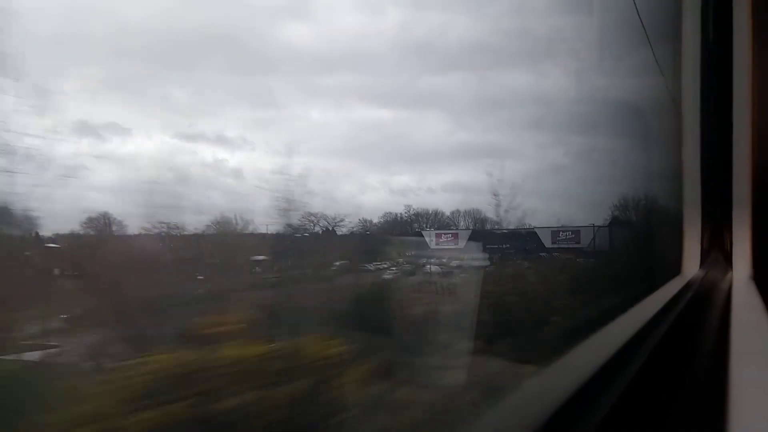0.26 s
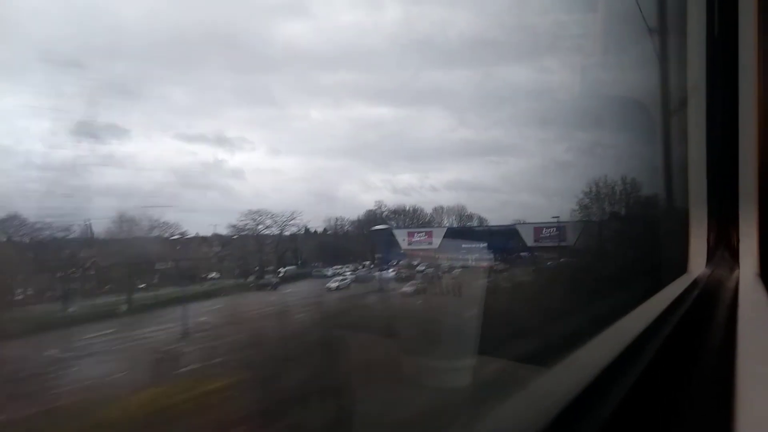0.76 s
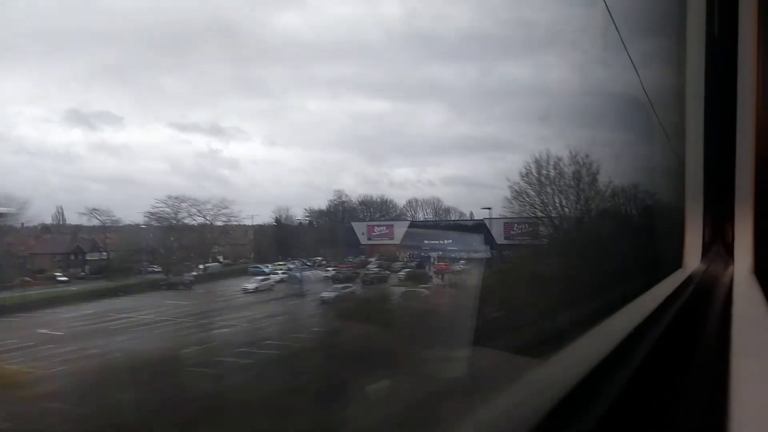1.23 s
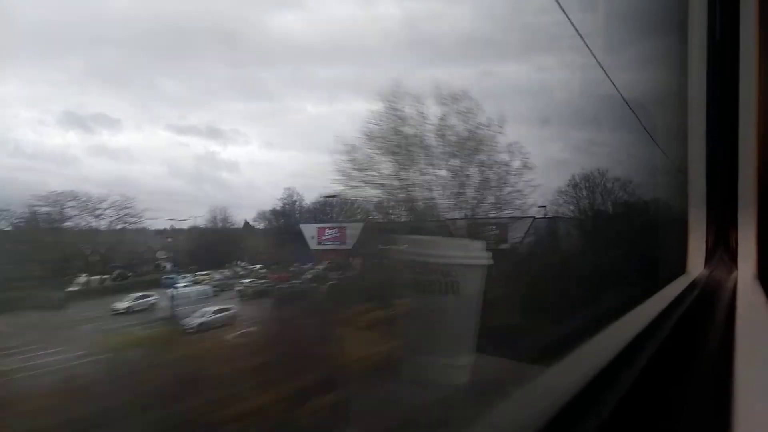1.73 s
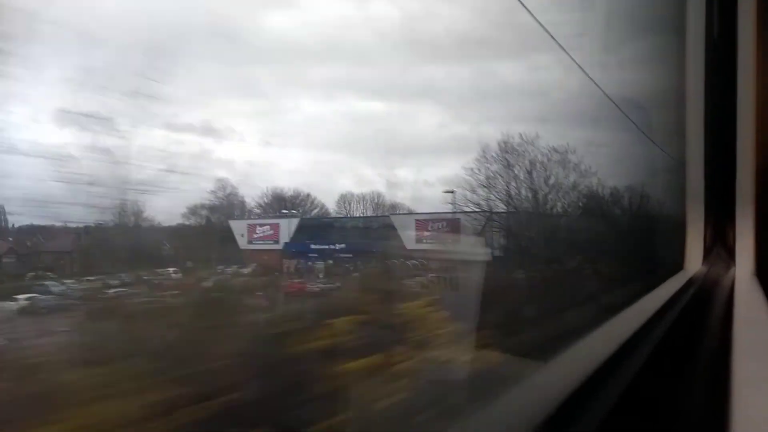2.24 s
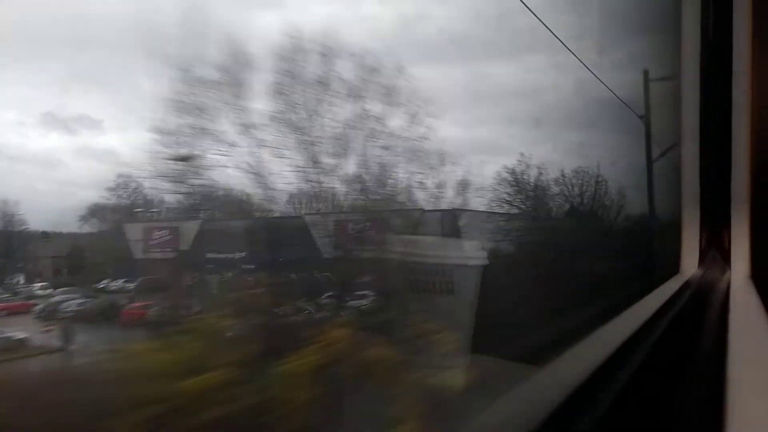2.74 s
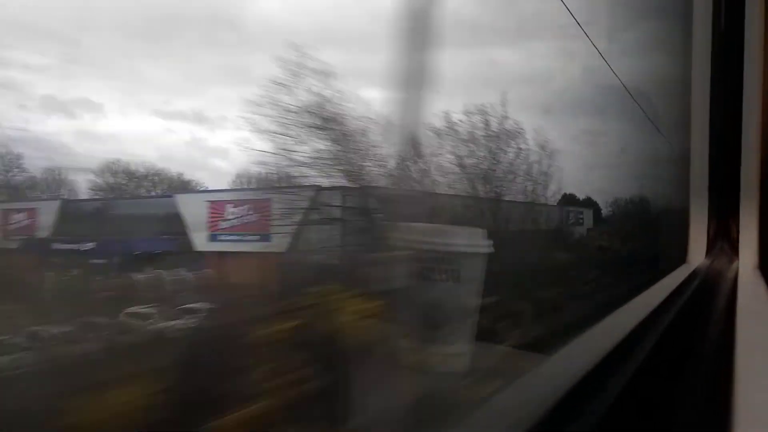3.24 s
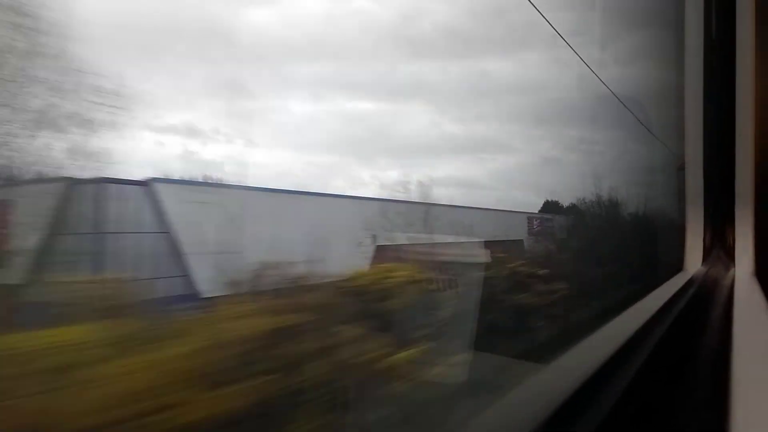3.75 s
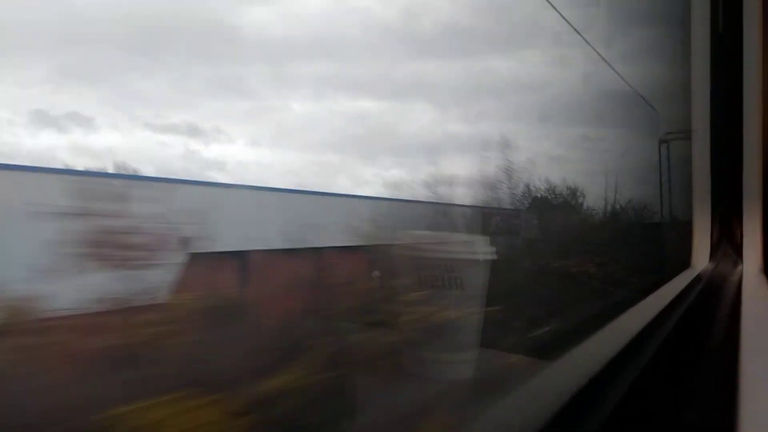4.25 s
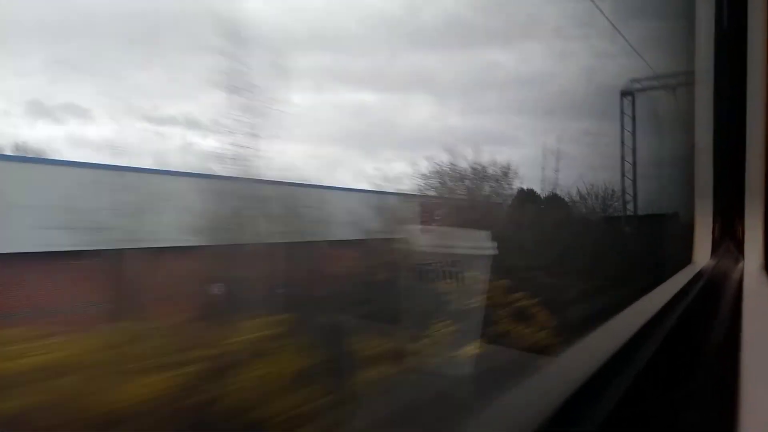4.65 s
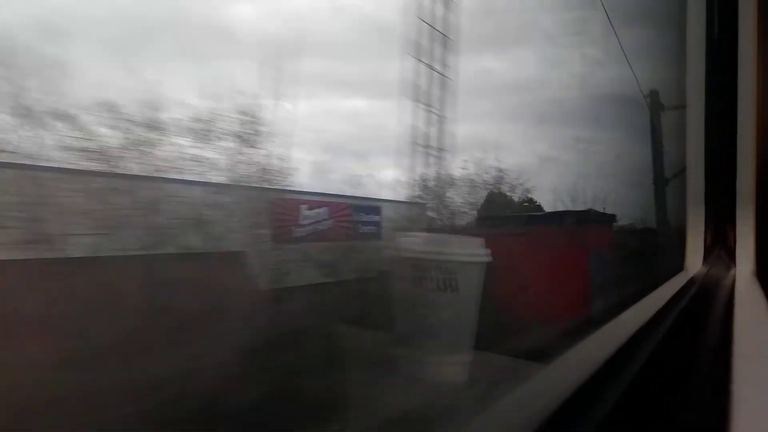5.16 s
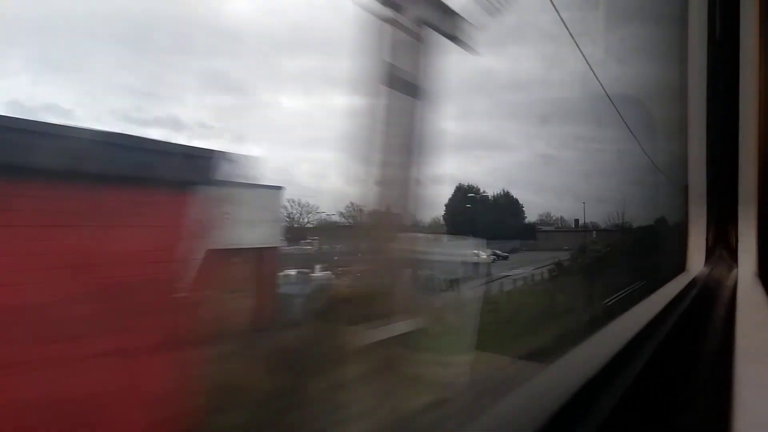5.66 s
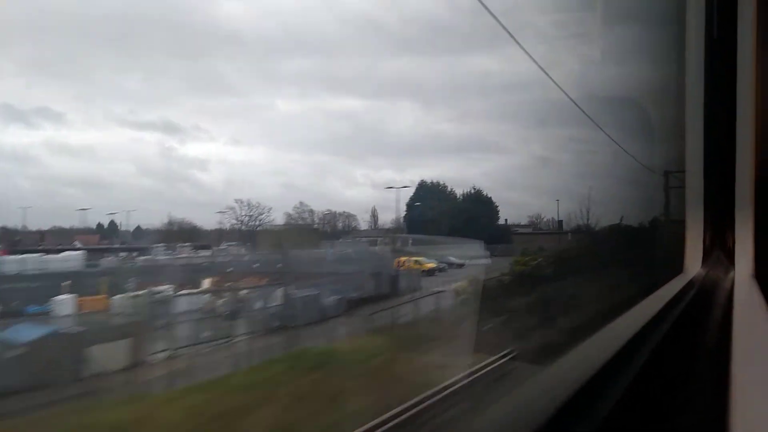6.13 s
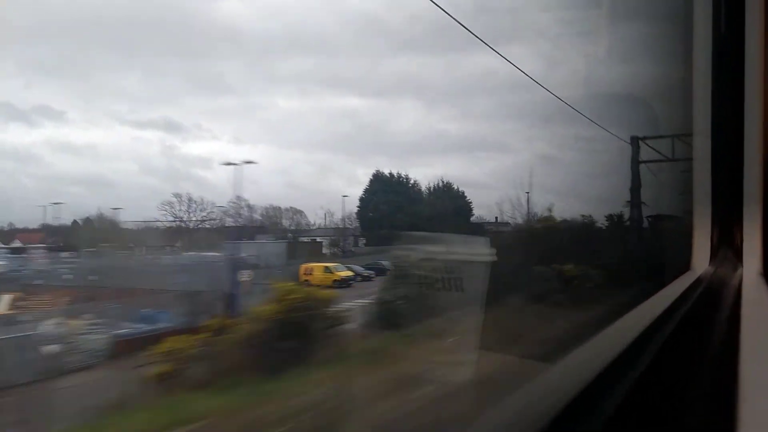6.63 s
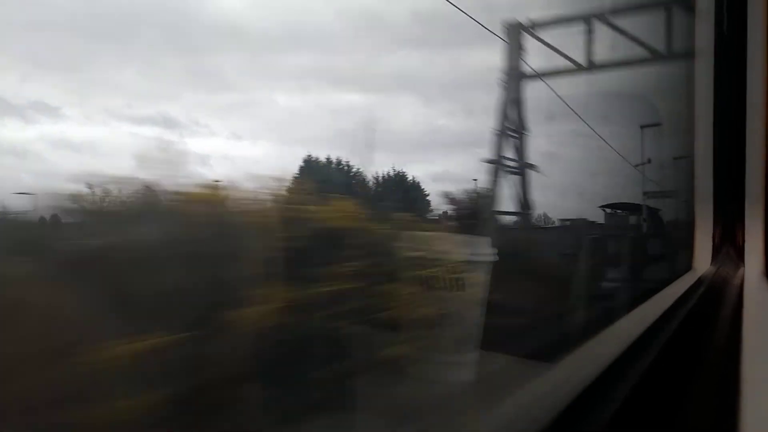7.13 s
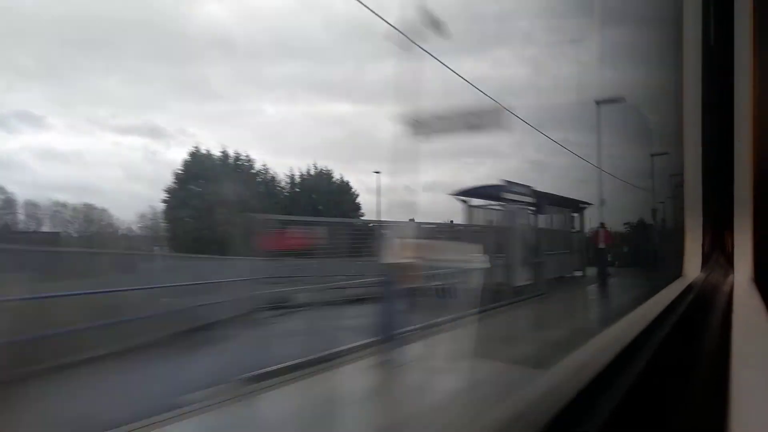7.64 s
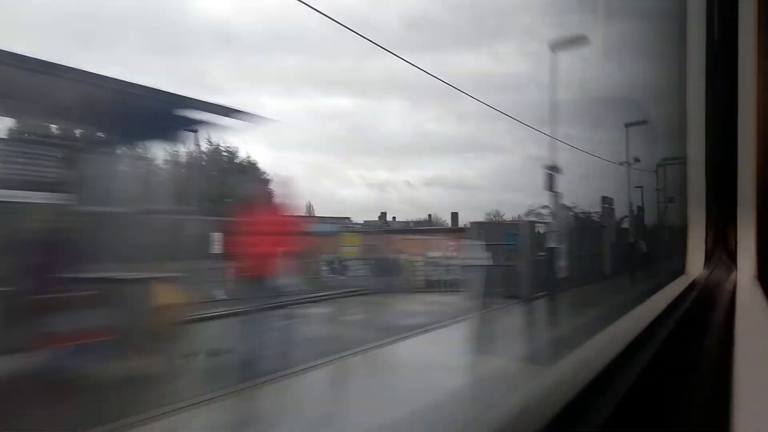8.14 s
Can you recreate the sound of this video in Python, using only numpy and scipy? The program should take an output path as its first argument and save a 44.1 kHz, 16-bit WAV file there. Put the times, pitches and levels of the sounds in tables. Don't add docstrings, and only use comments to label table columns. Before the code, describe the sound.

Inside a fast electric train, steady low wheel rumble and motor hum, crinkling wrapper, and two hard taps that briefly duck everything.

```python
import sys
import numpy as np
from scipy import signal
from scipy.fft import rfft, irfft, next_fast_len
from scipy.io import wavfile
from scipy.ndimage import uniform_filter1d, map_coordinates

SR = 44100
rng = np.random.default_rng(int(sys.argv[2]) if len(sys.argv) > 2 else 0)


def waveform_to_disk(signal):
    frames = np.transpose(np.atleast_2d(signal))
    scaled = np.clip(frames, -1, 1) * 32767
    samples = np.round(scaled).astype(np.int16)
    wavfile.write(sys.argv[1], SR, samples)


def volts(x):
    e = np.asarray(x, float) / 20
    return 10 ** e


N = 369980
RUMBLE_DB = -28.5


def unit(x):
    return x / np.sqrt(np.mean(x ** 2) + 1e-20)


def along(points, hz):
    f, v = np.transpose(points)
    return np.interp(np.log(hz + 1), np.log(f + 1), v)


def curves(rows):
    s, *cols = np.transpose(rows)
    return [np.interp(np.arange(N) / SR, s, c) for c in cols]


def wobble(rate_hz, count=N):
    knots = rng.standard_normal(int(count * rate_hz / SR) + 4)
    coarse = np.arange(0, count + 16, 16)
    values = map_coordinates(knots, [coarse * rate_hz / SR], mode="nearest")
    return np.interp(np.arange(count), coarse, values)


def filtered(x, response):
    m = next_fast_len(N + SR // 4)
    return irfft(rfft(x, m) * response(np.fft.rfftfreq(m, 1 / SR)), m)[..., :N]


def shaped(x, points):
    return unit(filtered(x, lambda hz: volts(along(points, hz))))


def patchy(patchy_db, size=512):
    z = signal.stft(rng.standard_normal(N), nperseg=size)[2]
    field = uniform_filter1d(rng.standard_normal(z.shape), size=5, axis=0)
    field = uniform_filter1d(field, size=8, axis=1)
    return signal.istft(z * volts(patchy_db * np.clip(unit(field), -2, 2)), nperseg=size)[1][:N]


def tone(pitch_hz, drift_rad):
    return np.sqrt(2) * np.sin(2 * np.pi * np.cumsum(pitch_hz) / SR + drift_rad * wobble(25))


def swell(start_s, end_s):
    inside = np.arange(round(start_s * SR), round(end_s * SR))
    inside = inside[(inside >= 0) & (inside < N)]
    out = np.zeros(N)
    out[inside] = np.sqrt(abs(np.sin(np.pi * (inside / SR - start_s) / (end_s - start_s))))
    return out


def add(track, s, sound):
    part = track[round(s * SR):][:len(sound)]
    part += sound[:len(part)]


# f/Hz, width/Hz, level/dB
BODY_MODES = [(136, 27, 3), (208.6, 55, -2.5), (299.7, 22, 2.5), (387.7, 26, 3.5), (655, 96, 3.5),
              (1320, 140, 0), (1645, 20, -20)]
# f/Hz, density/dB
RUMBLE_SPECTRUM = [(25, -30), (50, -9.5), (80, -2), (125, -2.5), (170, -6.5), (230, -7), (330, -17),
                   (460, -21.5), (600, -21.5), (760, -32.5), (1100, -34.5), (1500, -37.5), (2100, -42.5),
                   (3000, -44)]
ROAR_SPECTRUM = [(500, -17.5), (700, 3), (900, 4.5), (1150, -3), (1450, 2), (1900, -5), (2400, -5.5),
                 (3200, -8.5), (5000, -44.5)]
AIR_SPECTRUM = [(1500, 0.0), (2200, -20), (3000, -16), (4000, -6.5), (5500, -8), (7000, -13.5), (8200, -21),
                (9500, -23), (11000, -39), (12500, -41), (14000, -41)]
WRAPPER_SPECTRUM = [(1500, 0.0), (2200, -8.5), (3000, -2.5), (4000, -6), (5500, -8), (7000, -4),
                    (8200, -14), (9500, -11.5), (11000, -13), (12500, -14.5), (14000, -22.5)]
# t/s, level/dB
TRACK_ROUGHNESS = [(0, -1.5), (.4, .5), (.51, 3.5), (.58, -2), (1.2, 0), (2.3, -0.5), (2.7, 2), (3.1, -0.5),
                   (3.45, 1), (3.6, -3.5), (3.95, 1), (5.7, 0.5), (6.19, 1), (6.33, -3), (6.49, 2),
                   (6.6, 1), (7.7, 0), (8.39, 1)]
# t/s, level/dB
HANDLING_HISS = [(0, -22.5), (.62, -23), (.7, -23.5), (1.12, -20.5), (1.25, -24), (2.34, -23),
                 (2.55, -11.5), (2.9, -12.5), (3.04, -18.5), (3.3, -16), (3.6, -20.5), (4.6, -15.5),
                 (5.2, -22.5), (6.4, -25), (6.7, -17), (7.3, -22.5), (7.6, -22), (8.39, -22.5)]


def rolling():
    (track_db,), (hiss_db,) = curves(TRACK_ROUGHNESS), curves(HANDLING_HISS)
    roar_db = -14 + 0.1 * track_db + 0.5 * wobble(6)

    def through_body(points):
        def response(hz):
            modes = sum(volts(2 * db) / (1 + (2 * (hz - c) / w) ** 2) for c, w, db in BODY_MODES)
            return volts(along(points, hz)) * np.sqrt(1 + modes)
        return response

    rumble = unit(filtered(patchy(2.0, size=2048), through_body(RUMBLE_SPECTRUM + [(3600, -88)])))
    rumble = rumble * volts(0.72 * wobble(30) + 0.27 * wobble(9))
    roar = unit(filtered(patchy(3.5), through_body(ROAR_SPECTRUM)))
    still = shaped(patchy(2.5), [(1200, -57.5)] + AIR_SPECTRUM[1:])
    cloth = shaped(patchy(0.5), [(1200, -57)] + WRAPPER_SPECTRUM[1:])
    moving = np.clip((hiss_db + 29) / 8, 0, 1)
    hiss = np.sqrt(1 - moving) * still + np.sqrt(moving) * cloth * volts(1.65 * wobble(40))
    return volts(8 + track_db) * rumble + volts(roar_db + 0.5) * roar + volts(hiss_db + 2.5) * hiss


# t/s, ratio to first speed
SPEED_RATIO = [(0, 1), (4, 1.025), (5.7, 1.034), (8.39, 1.039)]
# start/s, end/s, f/Hz at first speed, level/dB
MOTOR_LINES = [(-.3, .45, 642, -42), (.4, 1.7, 642, -41), (1.5, 3.5, 642, -42), (3.4, 4.4, 642, -42),
               (4.4, 6.2, 642, -37.5), (6.1, 6.9, 642, -43), (6.9, 8.9, 642, -43), (.3, 1.1, 1284, -53),
               (1.7, 3.6, 1284, -54), (4.5, 6.3, 1284, -48), (-.3, .5, 620, -43), (1.8, 5.2, 620, -42),
               (-.4, .6, 595, -41), (.9, 1.7, 592, -40), (1.7, 3.5, 592, -40), (3.3, 4.3, 592, -40),
               (4.5, 5.2, 592, -40), (6.3, 7.2, 585, -40), (7.7, 8.8, 582, -42), (5.4, 5.8, 489, -44),
               (6.1, 7.1, 488.5, -39), (7.15, 8.9, 486.5, -39)]


def motors():
    speed, = curves(SPEED_RATIO)
    turns = 2 * np.pi * np.cumsum(speed) / SR
    out = np.zeros(N)
    for start, end, hz, db in MOTOR_LINES:
        span = slice(round(max(start, 0) * SR), round(end * SR))
        count = len(out[span])
        level = volts(db + 1.8 * wobble(9, count)) * swell(start, end)[span] ** 1.2
        out[span] += np.sqrt(2) * level * np.sin(hz * turns[span] + .45 * wobble(22, count))
    return out


# t/s, peak level/dB at full gain, hold/s
WRAPPER_SNAPS = [(.313, -33, 0.0038), (1.059, -36.5, .01), (1.379, -25.5, 0.017), (1.689, -33, 0.023),
                 (1.884, -29.5, 0.0061), (2.38, -28.5, 0), (2.652, -22.5, 0.012), (2.713, -26, 0.043),
                 (2.864, -25, 0.001), (2.954, -26, 0), (3.071, -23.5, 0.021), (3.155, -21.5, 0.011),
                 (3.234, -27.5, 0.014), (3.28, -24, 0.0016), (3.64, -28, 0.001), (3.872, -34, 0.016),
                 (4.047, -22, 0.017), (4.263, -23.5, 0.012), (4.303, -24.5, 0.0099), (4.407, -31, 0),
                 (4.463, -28, .01), (4.597, -23.5, 0.0042), (4.939, -30, 0), (6.722, -28, 0),
                 (6.813, -22, 0.0087), (7.081, -22.5, 0.0028), (7.167, -30.5, 0.032), (7.695, -25, 0.022),
                 (7.886, -19, 0.011), (7.989, -24, 0)]
# t/s, peak level/dB at full gain, hold/s
WRAPPER_CREASES = [(.047, -39, 0), (.549, -34.5, 0), (.686, -46, 0), (1.009, -32.5, 0.038),
                   (2.495, -26.5, 0.014), (2.566, -24.5, 0.046), (2.78, -23.5, 0.046), (3.42, -26, 0.06),
                   (3.488, -24.5, 0.033), (3.676, -26.5, 0.055), (3.817, -21.5, 0.005),
                   (3.928, -24.5, 0.0079), (4.507, -27, 0), (4.558, -17, 0), (5.064, -31.5, 0.011),
                   (6.467, -38, 0.0032), (6.65, -35, 0), (6.978, -25.5, 0.0024), (7.012, -33, 0),
                   (7.215, -26, 0.04), (7.79, -31, 0.0058), (8.078, -30.5, 0.008), (8.133, -30.5, 0),
                   (8.333, -34.5, 0)]


def wrapper():
    out, t = np.zeros(N), np.arange(SR // 5) / SR
    crackle = patchy(1) * volts(2.6 * wobble(400))
    bright = shaped(crackle, [(1500, -30), (2600, -32.5), (4500, -2.5)] + WRAPPER_SPECTRUM[4:])
    dull = shaped(crackle, [(1200, -12.0), (2300, 11.0), (3300, 16), (4600, -17), (6500, -33)])
    crack = volts(-1 - 60 * t / .03)
    snaps, creases = (WRAPPER_SNAPS, -10.5, 0.1, crack), (WRAPPER_CREASES, 0, 0.12, 0)
    for rows, dull_db, t60_s, sharp in [snaps, creases]:
        both = bright + volts(dull_db - 1.5) * dull
        for s, db, held_s in rows:
            piece = both[round(s * SR):][:len(t)]
            rise_s = .002 + .4 * held_s
            body = volts(-60 * np.maximum(t - held_s, 0) / t60_s) * (1 - np.exp(-t / rise_s))
            add(out, s, piece * (volts(db - 9.5) * (body + sharp))[:len(piece)])
    return out


# t/s, f/Hz, level/dB
PANEL_SQUEAL = [(.12, 2895, -58), (.165, 2890, -41), (.2, 2865, -61), (.23, 2930, -42), (.31, 2940, -49),
                (.325, 2870, -40.5), (.652, 2850, -42), (.67, 2860, -56), (.775, 2900, -46)]
# t/s, f/Hz, level/dB, overtone step/dB, hold/s
SHORT_SQUEAKS = [(0.691, 2880, -43, -30, 0.022), (0.693, 3400, -50, -30, .03),
                 (0.79, 2965, -35.5, -30, .014), (.8, 3200, -46, -30, .06), (0.809, 4250, -48, -30, .03),
                 (0.871, 2930, -46, -30, .03), (.92, 2820, -50, -30, .04), (1.04, 2620, -53, -30, .02),
                 (1.5, 6900, -64, -18, .025), (4.787, 3040, -37.5, -11, 0.029),
                 (6.196, 3033, -29.5, -10.5, 0.014)]
# t/s, level/dB
CHINKS = [
    (1.94, -61),
    (7.565, -56),
]
# f/Hz, level/dB
CHINK_PARTIALS = [(10200, 1), (12000, 2), (14200, -8)]


def squeaks():
    t = np.arange(SR // 5) / SR
    first, last = PANEL_SQUEAL[0], PANEL_SQUEAL[-1]
    fade_in, fade_out = (first[0] - .02, first[1], -90), (last[0] + 0.031, last[1], -90)
    pitch_hz, level_db = curves([fade_in] + PANEL_SQUEAL + [fade_out])
    out = volts(level_db + 1.5 + 1.7 * wobble(24.0)) * tone(pitch_hz, drift_rad=.15)
    order = np.arange(4)[:, None]
    for s, hz, db, step_db, hold_s in SHORT_SQUEAKS:
        cabin = volts(-9 - 60 * (t - hold_s) / .22)
        shape = (1 - np.exp(-t / 0.0013)) * np.where(t < hold_s, 1, cabin)
        flutter = volts(3 * np.array([wobble(92, len(t)) for _ in range(4)]))
        partials = volts(step_db * order ** 0.54) * flutter * np.sin(2 * np.pi * hz * (order + 1) * t)
        add(out, s, volts(db) * shape * np.sum(partials, axis=0))
    for s, db in CHINKS:
        ring = sum(volts(level + 4 * wobble(89.9, len(t))) * np.sin(2 * np.pi * hz * t)
                   for hz, level in CHINK_PARTIALS)
        add(out, s, volts(db) * ring * (1 - np.exp(-t / .006)) * np.exp(-(t / .06) ** 4))
    return out


# t/s, peak level/dB, centre f/Hz, T60/s
BUMPS = [(6.527, -21, 610, 0.16), (6.527, -28, 1450, 0.2), (6.527, -33, 4200, 0.11), (8, -30, 190, 0.092),
         (0.67, -27, 290, 0.13), (3.4, -18.5, 146, 0.56), (9.7, -15, 194, 0.14), (.685, -42, 3100, .9),
         (0.7, -40.5, 3400, 1), (0.71, -44, 4200, 0.67), (7.3, -39, 4000, .09)]


def knocks():
    out, t = np.zeros(N), np.arange(SR // 4) / SR
    for s, db, hz, t60_s in BUMPS:
        sos = signal.butter(2, [hz * 0.58, hz * 1.1], "bandpass", fs=SR, output="sos")
        burst = unit(signal.sosfilt(sos, rng.standard_normal(len(t))))
        add(out, s, volts(db - 60 * t / t60_s) * (1 - np.exp(-t / 0.00056)) * burst)
    return out


# t/s, blow level/dB, first touch level/dB, touch to blow/s
FINGER_TAPS = [
    (1.29760, 3, -3, .00016),
    (4.00029, 4, 1.5, .00021),
]


def taps():
    lead_s = .001
    out, t = np.zeros(N), np.arange(SR // 200) / SR - lead_s

    def bump(centre_s, width_s):
        return np.exp(-((t - centre_s) / width_s) ** 2)

    for s, blow_db, touch_db, gap_s in FINGER_TAPS:
        press = volts(touch_db) * bump(0, .00004) + volts(blow_db) * bump(gap_s, .00011)
        rebound = .4 * bump(gap_s + .0004, .00022)
        add(out, s - lead_s, rebound - press)
    return out


# start/s, end/s, f/Hz, level/dB
RAIL_TONES = [
    (4.502, 6.1, 1633, -59.5),
    (6.3, 7.097, 1207, -51.5),
    (7.302, 8.5, 1510, -50),
]


def rail_tones():
    return sum(volts(db) * swell(start, end) * tone(np.full(N, hz), drift_rad=0.55)
               for start, end, hz, db in RAIL_TONES)


def lens_motor():
    frame_rate_hz = 29.98
    phase = (np.arange(N) / SR - 5.198) * frame_rate_hz
    frame = np.floor(phase).astype(int)
    strength = volts(3.4 * rng.standard_normal(400))[frame - frame[0]]
    age_s = (phase - frame) / frame_rate_hz
    buzz = rng.standard_normal(N) * strength * (1 - np.exp(-age_s / .001)) * np.exp(-(age_s / 0.0093) ** 2)
    return volts(-29.0) * shaped(buzz, [(8500, -23), (9700, -5.0), (10600, -13), (11500, -4), (12600, -40)])


def gain_control():
    hold_s, recover_s, aim_db = 0.11, 0.76, 2.5
    shock_db, shock_s = 5, 0.011
    gain_db = np.zeros(N)
    for tap, duck_db in zip(FINGER_TAPS, (21, 28.5)):
        age_s = np.maximum(np.arange(N) / SR - tap[0] - .001, 0)
        creep_db = duck_db * np.exp(-np.maximum(age_s - hold_s, 0) / recover_s)
        loss_db = np.maximum(creep_db - aim_db, 0) + shock_db * np.exp(-age_s / shock_s)
        gain_db -= loss_db * np.clip(age_s / .004, 0, 1)
    return volts(gain_db)


def scene():
    gain = gain_control()
    ticks = volts(RUMBLE_DB) * uniform_filter1d(gain, size=4000) * lens_motor()
    ridden = gain * (volts(RUMBLE_DB) * rolling() + motors() + wrapper())
    heard = ridden + rail_tones() + squeaks() + knocks() + taps()
    return heard + ticks * volts([[0], [-10]])


# f/Hz, level/dB
LEFT_OVER_RIGHT = [(50, 3), (200, 2.4), (450, 1.4), (1000, 1.7), (2300, 0), (3600, 1), (4700, .3),
                   (6500, -1), (9000, -1.5), (12500, -5)]
# f/Hz, phase/rad
RIGHT_TWIST = [(40, .25), (200, .6), (400, .85), (600, .45), (1000, .15), (2200, .05), (4700, -.15),
               (7000, .35), (9400, 0)]


def right_port(x):
    def late(hz):
        lag_rad = 2 * np.pi * hz * 18.7 / SR + along(RIGHT_TWIST, hz)
        return -volts(-along(LEFT_OVER_RIGHT, hz)) * np.exp(-1j * lag_rad)
    return filtered(x, late)


# f/Hz, share
RIGHT_NOISE_SHARE = [(4000, 0), (5000, .025), (7000, .13), (9500, .17), (12000, .2)]
# f/Hz, share
SIDE_NOISE_SHARE = [(600, 0), (1000, .12), (2000, .35), (4000, .55), (9000, .8)]


def joint_stereo(left, right):
    hz, _, (left, right) = signal.stft(np.array([left, right]), SR, nperseg=256)
    calm = np.sum(abs(left[hz > 800]) ** 2, axis=0) < volts(-62)
    turns = np.exp(2j * np.pi * rng.random((2, *left.shape))) * np.sqrt(2)
    steady = uniform_filter1d(abs(left), size=9, axis=1)
    noisy = calm & (steady < volts(4) * uniform_filter1d(steady, size=9, axis=0))

    def blend(z, table, turn):
        share = noisy * np.clip(along(table, hz), 0, 1)[:, None]
        return z * (np.sqrt(1 - share) + np.sqrt(share) * turn)

    def band_power(z):
        return uniform_filter1d(abs(z) ** 2, size=9, axis=1)

    right = blend(right, RIGHT_NOISE_SHARE, turns[0])
    mid, side = (left + right) / 2, (left - right) / 2
    weak = calm & (hz[:, None] > 1500) & (band_power(mid) < volts(-19) * band_power(side))
    pair = np.array([np.where(weak, volts(-16), 1) * mid, blend(side, SIDE_NOISE_SHARE, turns[1])])
    kept = ~calm | (hz[:, None] < 14300)
    mid, side = signal.istft(pair * kept, SR, nperseg=256)[1][:, :N]
    return np.array([mid + side, mid - side])


def roll_off(x):
    return signal.sosfilt(signal.butter(12, 14750, fs=SR, output="sos"), x)


def record(dry):
    both = joint_stereo(dry[0], right_port(dry[1]))
    return roll_off(np.clip(both, -1, 1))


dry = scene()
out = record(dry)
waveform_to_disk(out)
```